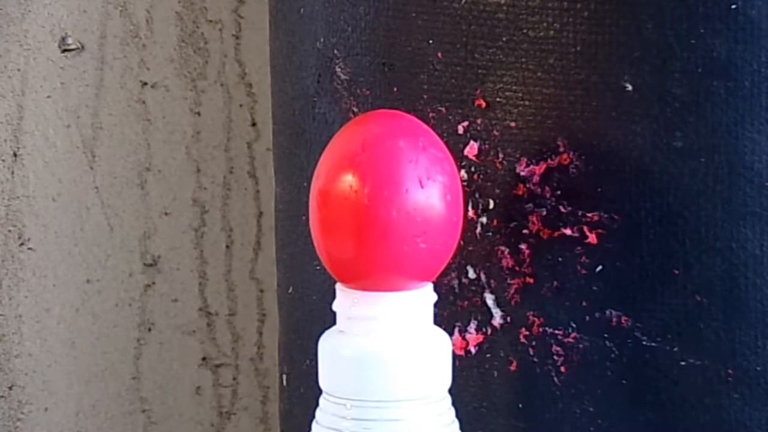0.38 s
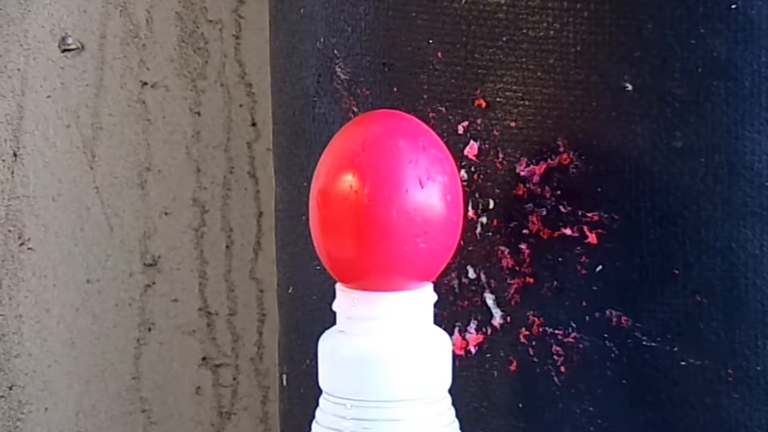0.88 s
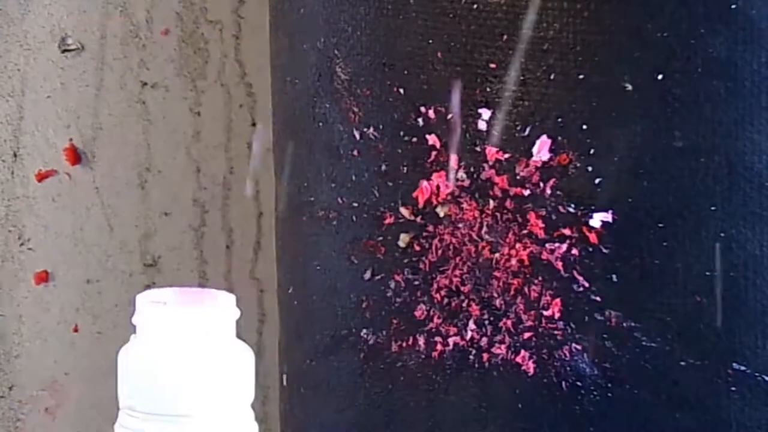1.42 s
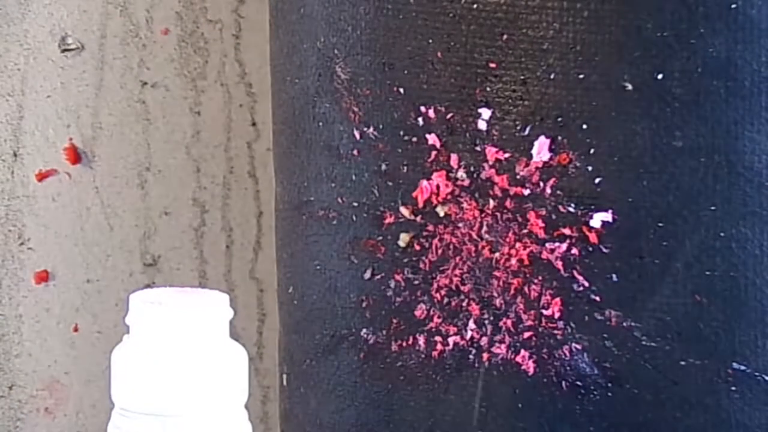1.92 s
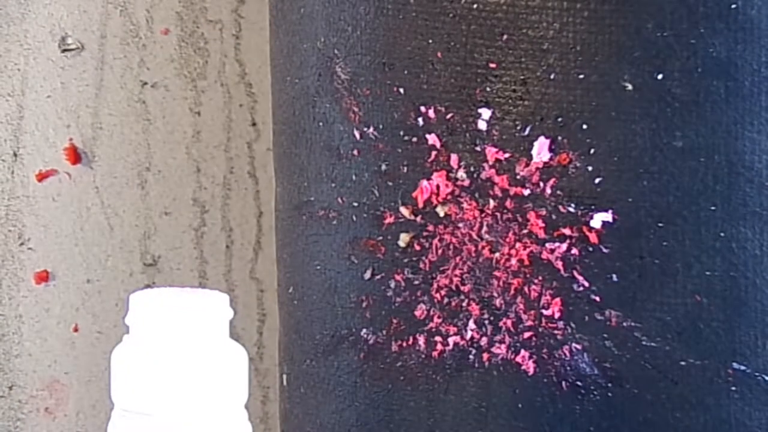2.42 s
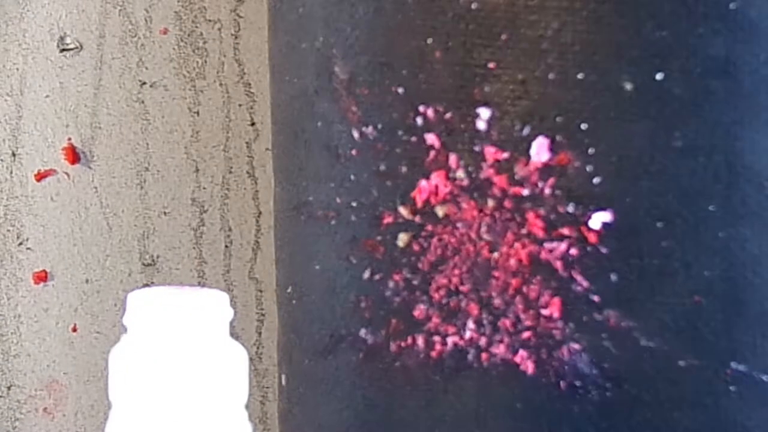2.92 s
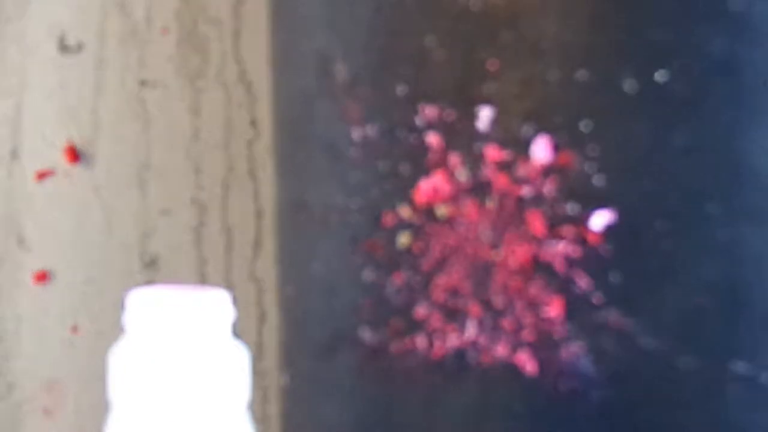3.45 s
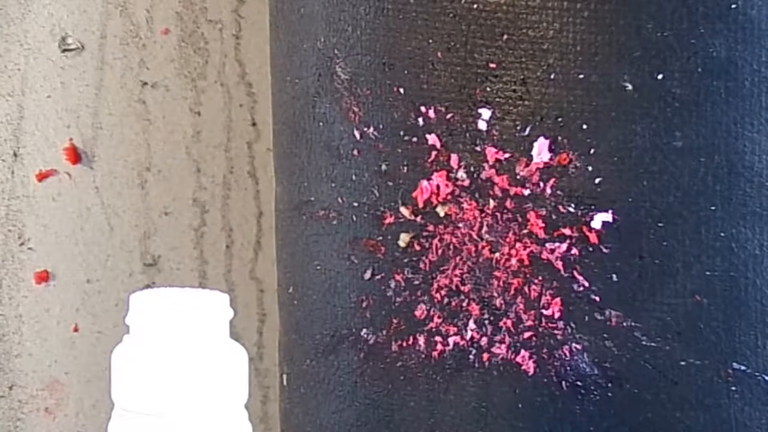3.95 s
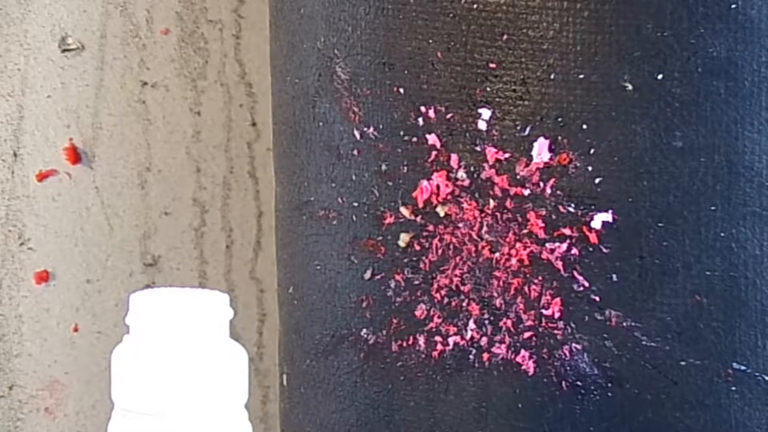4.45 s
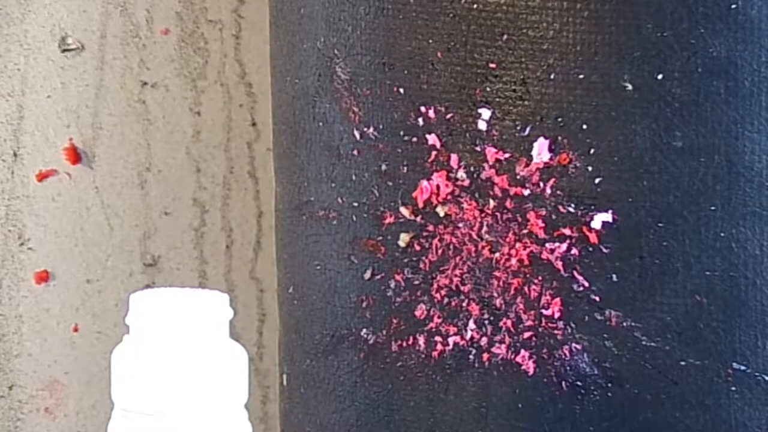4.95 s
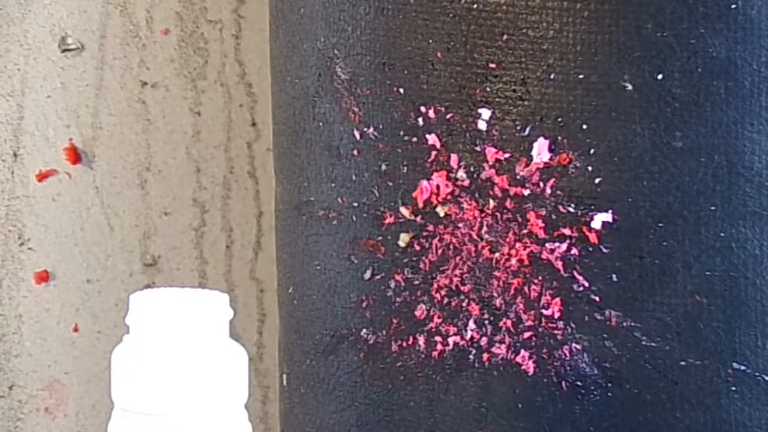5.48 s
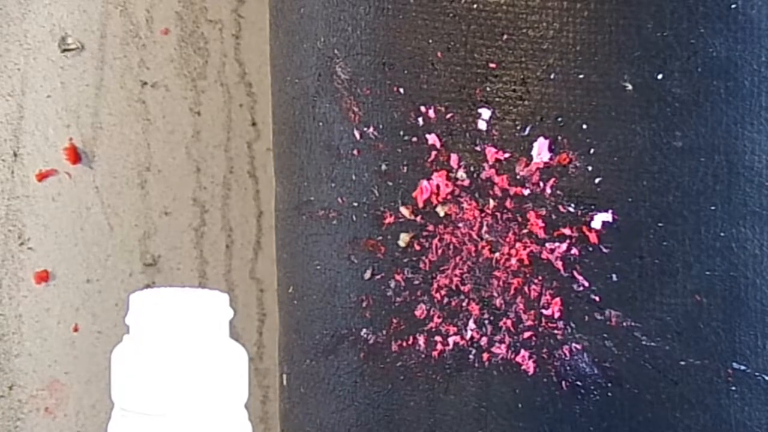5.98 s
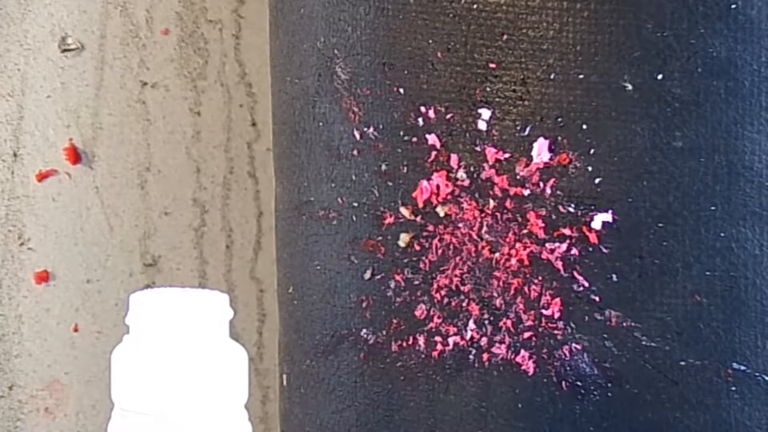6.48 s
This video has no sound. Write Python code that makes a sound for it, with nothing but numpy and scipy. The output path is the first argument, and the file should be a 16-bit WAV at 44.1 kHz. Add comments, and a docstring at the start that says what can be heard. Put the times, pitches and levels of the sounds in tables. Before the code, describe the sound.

Engine drone and faint motor buzz, a sudden overloaded air-gun snap with a bright echo, tiny ticks, then wooden knocks and a metallic clink.

```python
"""Hard-walled workshop: an air rifle fires and bursts a shell on a bottle (filtered noise bursts, ringing board).
Fragments tick down (bright noise puffs); the gun is handled with knocks, scuffs and a metal clink (dying sines).
Engines drone outside (crank orders, rumble, rasp, hiss); a small motor buzzes near the microphone (fixed multiples).
The recorder notches out four narrow bands, overloads and turns itself down."""
import sys
import numpy as np
from scipy import signal
from scipy.fft import rfft, irfft
from scipy.io import wavfile

SR = 44100
rng = np.random.default_rng(int(sys.argv[2]) if len(sys.argv) > 2 else 0)


def persist_wave(psi):
    """Save psi, clipped to +-1, as 16-bit WAV."""
    counts = np.round(np.clip(psi, -1, 1) * 32767).astype(np.int16)
    wavfile.write(sys.argv[1], SR, np.atleast_2d(counts).T)


def convert_level_to_amplitude(level_db):
    """Map a level in decibels to its linear amplitude factor."""
    exponent = np.asarray(level_db, float) / 20
    return 10 ** exponent


N = 291942
T = np.arange(N) / SR

# Engine climbing through three gears: (time [s], crank rate [Hz])
CLIMB_SPEED = [(0.0, 26.78), (0.5, 28.1), (0.75, 28.04), (1.3, 22.9), (1.57, 24.0), (1.84, 24.33),
               (2.93, 27.93), (3.2, 27.74), (4.5, 23.0), (4.82, 23.77), (5.77, 26.94), (6.4, 26.9)]
# Its pulls in gear: (start [s], end [s], level before effort [dB])
CLIMB_PULLS = [(0.0, 0.726, -37.5), (1.372, 3.049, -33), (4.505, 6.206, -33)]
# Its crank orders: (order [multiple], relative level [dB])
CLIMB_ORDERS = [(3, -12.5), (4, -27), (5, -43), (6, 1.5), (7, -33), (7.5, -16), (8, -15.5), (9, -8),
                (10, -27), (10.5, -21), (11, -15), (12, -15.5), (13, -42), (15, -26.5)]
# Engine that slows and leaves: (time [s], crank rate [Hz], level [dB])
LEAVING = [(0.0, 24.05, -32.5), (0.35, 24.4, -30), (0.71, 24.55, -30), (0.88, 22.89, -36.5),
           (1.06, 21.7, -27)]
# Its crank orders: (order [multiple], relative level [dB])
LEAVING_ORDERS = [(3, -19.5), (4, -20), (5, -0.5), (6, -8), (7, -7.5), (8, -13.5), (9, -7.5), (10, -8),
                  (11, -20.5), (12, -14), (13, -15.5), (14, -16), (15, -18), (16, -19.5), (17, -21.5),
                  (18, -17.5), (21, -18), (25, -13)]
# Slow heavy engine gathering speed as it passes: (time [s], cycle rate [Hz], level [dB])
HEAVY = [(1.7, 13.8, -58.5), (2.0, 14.24, -41.5), (2.79, 13.95, -41), (3.34, 14.82, -37),
         (3.89, 15.02, -36), (4.43, 15.21, -39), (4.98, 15.4, -37), (5.8, 15.7, -43), (6.62, 15.89, -45.5)]
# Its cycle orders: (order [multiple], relative level [dB])
HEAVY_ORDERS = [(3, -16), (5, 0), (6, -9), (7, -7), (8, 0), (9, -2), (10, -14), (11, -4.5), (12, -8.5),
                (13, -23), (14, -35), (15, -17), (16, -21), (17, -28), (19, -15.5), (20, -14), (22, -12),
                (23, -23), (24, -17.5), (25, -18.5), (27, -16)]
# Brief low drone that swells and goes: (time [s], rate [Hz], level [dB])
DRONE = [(1.25, 51.9, -39), (1.55, 52.95, -39), (1.85, 51, -62.5)]
# Its orders: (order [multiple], relative level [dB])
DRONE_ORDERS = [(1, -4), (2, 2), (4, -2), (5, -4)]
# Standing waves of the workshop: (centre [Hz], width [Hz], lift [dB])
STANDING_WAVES = [(73.4, 2.6, 8.5), (77.66, 1.3, -14.5), (83.3, 3.4, 10.5), (121, 4.6, -0.5),
                  (137, 7.6, -8), (147, 5, 3), (151.8, 4, -12.5), (155.4, 3, -1.5), (159.66, 2, -10.5),
                  (160.4, 6.6, 4), (165.4, 0.89, -5), (217.1, 6.6, -5), (226, 4.4, 4), (236.5, 9.2, 4.5),
                  (246.7, 6.1, -16), (253, 5, 6), (357.5, 12.5, 12.5), (404, 28, 4)]
# How hard and how near the traffic pulls: (time [s], effort [dB])
EFFORT = [(0.0, 6.5), (0.1, 5.5), (1.05, -2), (1.9, 1.5), (2.5, 4), (2.7, 3), (3.06, -2), (3.42, -5.5),
          (4.04, -5), (5.0, -1.5), (5.88, -2.5), (6.29, -6.5), (6.62, -8)]
TONE_SHARE = 0.57  # share of the effort that the climbing engine's tones follow
# Street layers under effort: (level at zero effort [dB], share of effort followed [ratio])
RASP_LEVEL = (-40, 1.46)
HISS_LEVEL = (-42.5, 0.39)
RUMBLE_LEVEL = (-36.5, 0.37)
# Rumble spectrum: (frequency [Hz], relative density [dB per Hz])
RUMBLE_SPECTRUM = [(15, -55.5), (25, -28), (103, 4.5), (139, 4.5), (172, 1.5), (242, 0), (394, -7),
                   (500, -11), (650, -60.5), (1100, -82.5)]
# Exhaust pipe resonances: (centre [Hz], width [Hz], relative gain [dB])
EXHAUST_PIPES = [(350, 200, -12), (607, 75, 0), (800, 120, -3), (990, 240, -10), (1350, 600, -20)]
# Tyre hiss spectrum: (frequency [Hz], relative density [dB per Hz])
HISS_SPECTRUM = [(300, -16.5), (500, 0), (1000, 0), (1750, -6), (2500, -6), (4000, -13), (5800, -24.5),
                 (7500, -33.5), (8800, -32), (10300, -49.5), (12000, -48.5)]
MOTOR_HZ = 57.966  # shaft rate
# Strongest multiples of the shaft rate: (frequency [Hz], level [dB])
MOTOR_LINES = [(985.1, -65), (1507, -66.5), (2385, -63.5), (2955, -73.5), (3305, -68.5), (3359, -67.5),
               (4000, -70), (4172, -73.5), (4694, -81.5), (4813, -79), (4872, -74.5), (5044, -74.5),
               (5103, -70), (5157, -77.5), (5276, -76.5), (5448, -78.5), (5566, -76), (5620, -72),
               (5739, -74.5), (5857, -80), (5911, -75), (5970, -83), (6089, -76.5), (6142, -78.5),
               (6202, -87), (6320, -77.5), (6433, -74.5), (6896, -86.5)]
# Mean curve of the other multiples, scattered later: (frequency [Hz], level [dB])
MOTOR_REST = [(900, -68), (1500, -72.5), (3000, -74.5), (4500, -85.5), (6000, -78), (7500, -93.5)]
# Muzzle blast, shell bursting, pellet in the board:
# (time [s], relative level [dB], decay time constant [s], bass cut [Hz])
SHOT = [(1.0719, 23, 0.0033, 2520), (1.076, 16.5, 0.014, 1503), (1.093, 14.5, .012, 201)]
# Shot spectrum: (frequency [Hz], relative density [dB per Hz])
BLAST_SPECTRUM = [(60, -42.5), (200, -32.5), (330, -21.5), (520, -17.5), (1100, -3), (1700, -7.5),
                  (2400, -4.5), (2800, -0.5), (3300, 0.5), (4000, -5), (5200, -10.5), (6500, -10),
                  (8700, -18.5), (10500, -33.5), (15700, -27.5)]
# Modes of the struck board: (frequency [Hz], relative level [dB], t60 [s])
BOARD_MODES = [(245, -15.5, 0.087), (625.7, -16.5, 0.057), (842.6, -1.5, 0.09), (1340, 8, 0.029),
               (1790, -2.5, 0.061)]
# Reverberation of the workshop: (frequency [Hz], t60 [s])
ROOM_DECAY = [(100, 0.97), (500, 0.432), (1000, 0.52), (1500, 0.61), (2200, 0.85), (3000, 0.79),
              (4000, 0.86), (6000, 0.74), (10000, 0.67), (15000, 0.41)]
# Fragments landing near the microphone: (time [s], level [dB])
TICKS = [(1.489, -42.5), (1.5234, -47.5), (1.5342, -46.5), (1.5633, -46.5), (1.6002, -53), (1.6116, -45),
         (1.6314, -49.5), (1.6444, -61), (1.6886, -51), (1.8094, -58), (2.0014, -51.5), (2.2344, -54.5),
         (2.2433, -50.5)]
# Soft scuffs and patter: (time [s], relative level [dB], rise [s], decay time constant [s])
SCUFFS = [(1.775, -35, 0.027, 0.1), (2.004, -36, 0.0092, 0.021), (2.139, -41.5, .02, .02),
          (2.239, -37, .008, 0.017), (2.315, -44, .005, .01), (2.546, -34.5, 0.01, .025),
          (2.601, -31.5, 0.0091, 0.039), (2.649, -30, 0.012, 0.039), (3.29, -41.5, 0.0095, 0.011),
          (3.412, -35.5, .006, .02), (3.855, -45, 0.077, 0.2)]
# Scuff spectrum: (frequency [Hz], relative density [dB per Hz])
SCUFF_SPECTRUM = [(400, -4), (1000, -3), (2200, 3.5), (3500, 4), (4800, -7), (7000, -13), (9300, -19.5),
                  (11000, -37), (13000, -34), (15500, -36)]
# Knocks on the wooden stock: (time [s], relative level [dB], pitch [Hz])
KNOCKS = [(2.452, -20.5, 2200), (2.546, -18, 2270), (2.5507, -11.5, 2450), (2.5557, -9.5, 2250),
          (2.558, -11.5, 1940), (2.591, -11, 2250), (2.5935, -8, 2000), (2.5986, -12.5, 1850),
          (2.613, -22.5, 2220), (2.6294, -15.5, 2280), (2.6694, -16, 2020), (2.674, -18, 2160),
          (3.4135, -24, 2130), (3.4175, -18, 2310), (3.4209, -21, 2100), (3.438, -32, 2450)]
# Modes of the stock: (frequency [ratio to pitch], relative level [dB], t60 [s])
STOCK_MODES = [(.28, -6, 0.045), (.45, -7, 0.053), (.7, -3.5, 0.01), (1, 10, 0.016), (1.45, -2, 0.009),
               (1.8, -1, 0.0087), (3.1, -15, .005)]
# Clinks of a loose metal part: (time [s], relative level [dB])
CLINKS = [(2.57, -55), (2.6051, -38), (2.6658, -40)]
# Modes of that part: (frequency [Hz])
STEEL_HZ = [7031, 7056, 7594, 7610, 9806, 9828, 9880, 10750, 11035]
# The same modes in order: (relative level [dB], t60 [s])
STEEL_DECAY = [(-6, .3), (-4, 0.33), (-3, .5), (3, 0.8), (-4, 0.69), (-6, 0.46), (-9, .3), (-8, .25),
               (-5, 0.43)]
# Converter noise spectrum: (frequency [Hz], relative density [dB per Hz])
SELF_NOISE_SPECTRUM = [(6000, -22.5), (10000, -5.5), (13000, -4.5), (15700, 0)]
# Recorder notch filters: (centre [Hz], width [Hz])
NOTCHES = [(3685, 220), (4375, 340), (8040, 760), (11740, 1010)]


def unit_rms(x):
    """Scales a signal to rms 1."""
    return x / np.sqrt(np.mean(x ** 2) + 1e-20)


def at_time(points):
    """Interpolates a (time, value) table over the scene."""
    return np.interp(T, *np.transpose(points))


def at_hz(points, hz):
    """Interpolates a (frequency, value) table on a log frequency axis."""
    f, value = np.transpose(points)
    return np.interp(np.log(hz + 1), np.log(f + 1), value)


def add(mix, start_s, sound):
    """Adds a sound in place, cut at the end of the mix."""
    part = mix[round(start_s * SR):][:len(sound)]
    part += sound[:len(part)]


def coloured(x, spectrum):
    """Causal minimum-phase filter of unit energy with the given spectrum."""
    log_gain = np.log(convert_level_to_amplitude(at_hz(spectrum, abs(np.fft.fftfreq(8192, 1 / SR)))))
    phase = -signal.hilbert(log_gain).imag
    taps = np.fft.ifft(np.exp(log_gain + 1j * phase)).real[:4096]
    return signal.oaconvolve(x, taps / np.linalg.norm(taps))[:len(x)]


def ring(modes, pitch=1.):
    """Dying sines of a struck body, one second, peak 1."""
    t = T[:SR, None]
    hz, db, t60_s = np.transpose(modes)
    sound = (convert_level_to_amplitude(db - 60 * t / t60_s) * np.sin(2 * np.pi * hz * pitch * t)).sum(1)
    return sound / abs(sound).max()


def puff(rise_s, decay_s):
    """Noise that swells linearly and dies exponentially, rms 1 at its top."""
    t = T[:round((rise_s + 8 * decay_s) * SR)]
    envelope = np.minimum(t / rise_s, np.exp((rise_s - t) / decay_s))
    return rng.standard_normal(len(t)) * envelope


def wander(rate_hz, count):
    """Slow random curves of rms about 1."""
    steps = rng.standard_normal((count, round(N / SR * rate_hz) + 2))
    curves = [np.interp(T * rate_hz, np.arange(len(row)), row) for row in steps]
    return np.array(curves) * 1.22  # makes up for the interpolation


def engine(speed, level, orders, waver_db):
    """Crank orders as sines, coloured by standing waves; weaker ones waver slowly at random in level."""
    crank_hz, level_db = at_time(speed), at_time(level)
    start_s, end_s = level[0][0], level[-1][0]
    fade = np.clip(np.minimum((T - start_s + 0.057) / 0.09, (end_s + 0.11 - T) / .25), 0, 1)
    on = fade > 0
    unsteady_hz = crank_hz * (1 + .0015 * wander(12, count=1)[0])
    turns = np.cumsum(unsteady_hz)[on] / SR
    waver = wander(5, count=len(orders))[:, on]
    grid_hz = np.arange(0, 700, .25)
    lift_db = sum(db / (1 + (2 * (grid_hz - hz) / width_hz) ** 2) for hz, width_hz, db in STANDING_WAVES)
    out = np.zeros(N)
    for (k, db), curve in zip(orders, waver):
        depth_db = waver_db * np.clip(-db / 15, 0, 1)
        tone_db = db + np.interp(k * crank_hz[on], grid_hz, lift_db) + depth_db * np.minimum(curve, 1)
        out[on] += convert_level_to_amplitude(tone_db) * np.sin(2 * np.pi * (k * turns + rng.random()))
    return np.sqrt(2) * fade * convert_level_to_amplitude(level_db) * out


def engines():
    """Four vehicles outside, each a sum of crank orders; the climbing one follows the effort."""
    out = np.zeros(N)
    for start_s, end_s, db in CLIMB_PULLS:
        out += engine(CLIMB_SPEED, [(start_s, db), (end_s, db)], CLIMB_ORDERS, waver_db=4.5)
    out *= convert_level_to_amplitude(TONE_SHARE * at_time(EFFORT))
    for rows, orders in (LEAVING, LEAVING_ORDERS), (HEAVY, HEAVY_ORDERS), (DRONE, DRONE_ORDERS):
        rows = np.array(rows)
        out += engine(rows[:, :2], rows[:, ::2], orders, waver_db=3.5)
    return out


def exhaust_rasp():
    """Noise popping through resonant pipes at each turn of the climbing engine, rms 1."""
    turns = np.cumsum(at_time(CLIMB_SPEED)) / SR - .68
    pops = np.exp(-(turns % 1) / 0.072) * np.where(turns % 2 < 1, 1, .35)  # every second one is weaker
    throb = 1 + pops * np.interp(T, [.3, 1.2], [4.2, .9])
    hz = np.fft.rfftfreq(N, 1 / SR)
    pipes = sum(convert_level_to_amplitude(db) / (1 + 2j * (hz - f) / width_hz) ** 2 for f, width_hz, db in EXHAUST_PIPES)
    pipes = pipes / (1 + (hz / 1800) ** 4)
    return unit_rms(irfft(rfft(rng.standard_normal(N) * throb) * pipes * hz / (hz + 300), N))


def street():
    """Rumble, exhaust rasp and tyre hiss as filtered noise whose levels follow the effort."""
    effort_db = at_time(EFFORT)
    levels = RASP_LEVEL, HISS_LEVEL, RUMBLE_LEVEL
    rasp_db, hiss_db, rumble_db = (db + share * effort_db for db, share in levels)
    swell = wander(7.5, count=2)
    rumble = convert_level_to_amplitude(rumble_db + 1.3 * swell[0]) * coloured(rng.standard_normal(N), RUMBLE_SPECTRUM)
    hiss = convert_level_to_amplitude(hiss_db + 0.807 * swell[1]) * coloured(rng.standard_normal(N), HISS_SPECTRUM)
    return rumble + convert_level_to_amplitude(rasp_db) * exhaust_rasp() + hiss


def motor():
    """Small motor at a locked speed: the same rattle every turn, so steady multiples of uneven height."""
    k = np.arange(16, 131)
    db = at_hz(MOTOR_REST, k * MOTOR_HZ) + 5 * np.minimum(rng.standard_normal(len(k)), 1)
    for hz, line_db in MOTOR_LINES:
        db[round(hz / MOTOR_HZ) - k[0]] = line_db
    turn = np.linspace(0, 1, 4097)
    rattle = (convert_level_to_amplitude(db) * np.sin(2 * np.pi * (k * turn[:, None] + rng.random(len(k))))).sum(1)
    return np.sqrt(2) * np.interp(T * MOTOR_HZ % 1, turn, rattle)


def shot():
    """Bursts of air and shell, each deeper than the last; the final one sets the board ringing."""
    out = np.zeros(N)
    for s, db, decay_s, cut_hz in SHOT:
        bass_cut = signal.butter(1, cut_hz, "high", fs=SR)
        add(out, s, convert_level_to_amplitude(db) * signal.lfilter(*bass_cut, puff(.0008, decay_s)))
    out = coloured(out, BLAST_SPECTRUM)
    add(out, SHOT[-1][0], convert_level_to_amplitude(20.0) * ring(BOARD_MODES))
    return out


def room(x, count=8):
    """Dense reverberation, each band dying at its own speed; successive instants use different random tails."""
    noise = rng.standard_normal((count, SR * 3 // 2))
    hz, t, z = signal.stft(noise, SR, nperseg=256)
    decay = convert_level_to_amplitude(-60 * t / at_hz(ROOM_DECAY, hz)[:, None])
    tails = signal.istft(z * decay, SR, nperseg=256)[1]
    tails *= np.clip((T[:tails.shape[1]] - .003) / .012, 0, 1)  # the field builds up
    tails /= np.linalg.norm(tails[0])
    # rotating the tails keeps the reverberation smooth
    away = (T * 600 - np.arange(count)[:, None] + count / 2) % count - count / 2
    windows = np.cos(np.pi / 2 * np.clip(away, -1, 1))  # squares sum to 1
    return signal.fftconvolve(x * windows, tails, axes=1).sum(0)[:N]


def fragments():
    """Tiny bright ticks close by, as short noise puffs without reverberation."""
    out = np.zeros(N)
    for s, db in TICKS:
        add(out, s, convert_level_to_amplitude(db) * puff(.0005, .003))
    return coloured(out, [(2000, -19.5), (7000, -10.0), (11000, -5.5), (14000, -4.0), (17000, -3.0)])


def handling():
    """Short knocks ring the wooden stock, each with a noise puff; scuffs are softer puffs."""
    knocks, scuffs = np.zeros((2, N))
    blunt_contact = np.hanning(15) / 6
    for s, db, hz in KNOCKS:
        add(knocks, s, convert_level_to_amplitude(db) * np.convolve(ring(STOCK_MODES, hz), blunt_contact))
        add(scuffs, s, convert_level_to_amplitude(db - 19) * puff(0.0015, 0.0033))
    for s, db, rise_s, decay_s in SCUFFS:
        add(scuffs, s, convert_level_to_amplitude(db) * puff(rise_s, decay_s))
    return knocks, coloured(scuffs, SCUFF_SPECTRUM)


def clinks():
    """Small steel part: close pairs of modes beat as they die, and it chatters against its seat."""
    out = np.zeros(N)
    onset = np.minimum(T[:SR] / .003, 1)
    for s, db in CLINKS:
        add(out, s, convert_level_to_amplitude(db) * ring(np.c_[STEEL_HZ, STEEL_DECAY]) * onset)
    return out * convert_level_to_amplitude(3.2 * wander(70, count=1)[0])


def scene():
    """Near sounds in the room over the drone from outside."""
    bang = shot()
    knocks, scuffs = handling()
    direct = convert_level_to_amplitude(3.5) * bang + knocks + scuffs
    reverb = room(convert_level_to_amplitude(-2.0) * bang + convert_level_to_amplitude(-2) * knocks + convert_level_to_amplitude(-3.0) * scuffs)
    return (direct + reverb + clinks() + fragments() + engines() + street() + motor())[None]


def low_pass(x):
    """Removes everything above the highest recorded frequency."""
    return signal.sosfilt(signal.butter(12, 15850, fs=SR, output="sos"), x)


def record(dry):
    """Converter hiss, notch filters, a gain control too slow to stop the first overload, clipping."""
    x = dry[0] + convert_level_to_amplitude(-72) * coloured(rng.standard_normal(N), SELF_NOISE_SPECTRUM)
    for hz, width_hz in NOTCHES:
        x = signal.lfilter(*signal.iirnotch(hz, hz / width_hz, SR), x)
    keep = np.exp(-1 / (0.031 * SR))  # time constant [s]
    power = signal.lfilter([1 - keep], [1, -keep], x ** 2)
    power_db = 10 * np.log10(power + 1e-12)
    over_db = 0.6 * np.maximum(power_db + 7.0, 0)
    lag = round(.09 * SR)  # the control acts on a running mean of the recent past
    down_db = signal.oaconvolve(over_db, np.ones(lag) / lag)[:N]
    ceiling = 0.99  # of full scale
    mix = np.clip(x / convert_level_to_amplitude(down_db), -ceiling, ceiling)[None]
    return low_pass(mix)


dry = scene()
out = record(dry)
persist_wave(out)
```